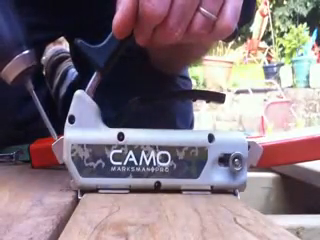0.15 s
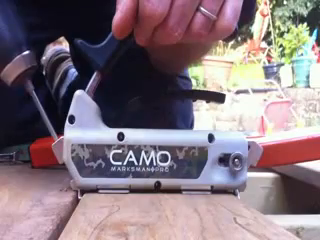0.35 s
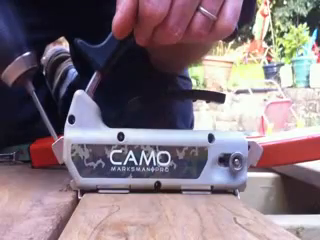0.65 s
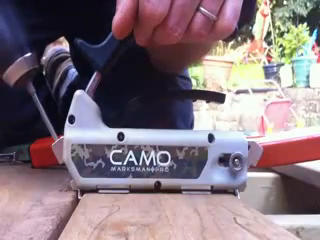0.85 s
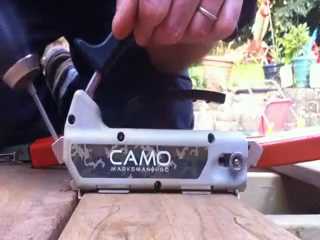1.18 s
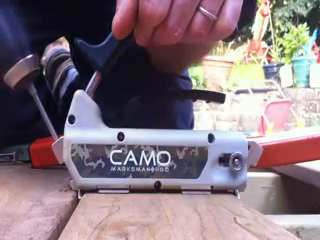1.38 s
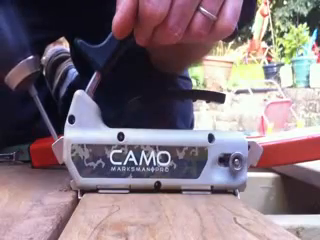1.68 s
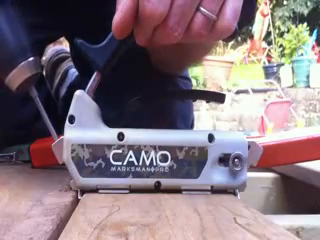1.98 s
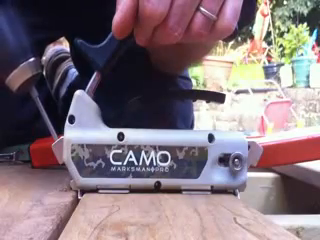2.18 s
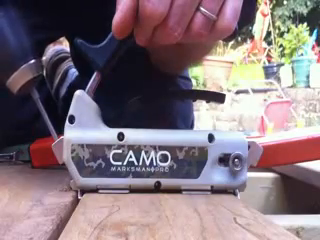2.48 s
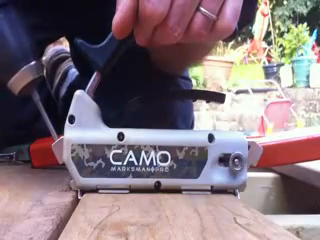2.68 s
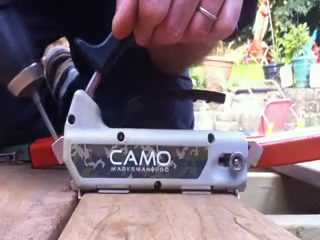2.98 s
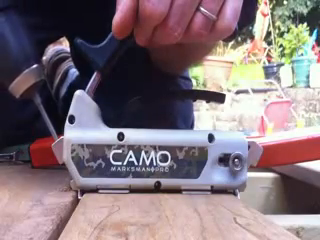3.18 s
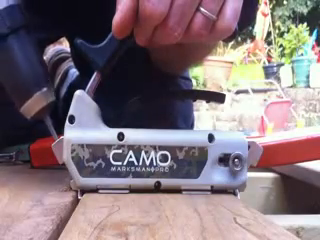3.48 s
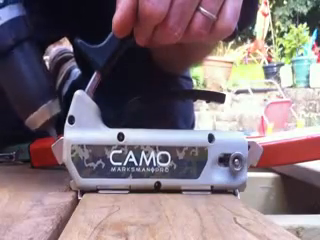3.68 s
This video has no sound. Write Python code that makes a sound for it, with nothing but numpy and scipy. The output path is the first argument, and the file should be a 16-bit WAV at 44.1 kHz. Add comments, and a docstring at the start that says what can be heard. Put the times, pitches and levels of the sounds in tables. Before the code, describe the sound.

A cordless drill, already at full speed and close to the microphone, whines shrilly over fan hiss; the screw grinds and squeaks in the hardwood board, then the pitch drops as it seats. Dry outdoor sound.

```python
"""A cordless drill runs flat out, close to the microphone, driving a screw into a hardwood board.
Its motor and gears whine as tones locked to the shaft angle; the speed sags as the screw bites.
Under them are shaped noise for fan air and brushes, and grainy noise for the thread in the wood.
The screw squeaks in short, rough tones, and the whine drops as the head seats."""
import sys
import numpy as np
from scipy import signal
from scipy.fft import rfft, irfft, next_fast_len
from scipy.io import wavfile
from scipy.ndimage import uniform_filter1d, map_coordinates

SR = 44100
rng = np.random.default_rng(int(sys.argv[2]) if len(sys.argv) > 2 else 0)


def dump_mix(stems):
    """Bounce the given channels to the path in sys.argv[1] as a 16-bit WAV at rate SR."""
    frames = np.atleast_2d(stems).T  # one column per channel
    limited = np.clip(frames, -1, 1)  # hard clip at full scale
    pcm = np.round(limited * 32767).astype(np.int16)
    wavfile.write(sys.argv[1], SR, pcm)


N = 169785  # length of the scene, samples

# Motor speed before its small jitter: time_s, speed_turns_per_s
MOTOR_SPEED = [(0, 119.2), (.2, 119.3), (.36, 119.55), (.6, 118.8), (.7, 118.9), (1.02, 118.27),
               (1.3, 117.92), (1.55, 118.0), (1.97, 117.48), (2.45, 117.4), (2.7, 116.42), (2.85, 116.34),
               (2.95, 116.86), (3.35, 116.3), (3.48, 115.9), (3.53, 115.1), (3.58, 115.55), (3.7, 113.7),
               (3.78, 110.5), (3.85, 105.6)]


def amp(db):
    """Decibels to gain."""
    return 10 ** (np.asarray(db) / 20)


def unit(x):
    """Scale to rms 1."""
    return x / np.sqrt(np.mean(x ** 2) + 1e-20)


def curves(rows):
    """One value per sample for each column after the time."""
    times_s, *columns = np.transpose(rows)
    return [np.interp(np.arange(N) / SR, times_s, column) for column in columns]


def wobble(rate):
    """A smooth random curve through rate random knots a second."""
    knots = rng.standard_normal(int(N * rate / SR) + 4)
    return map_coordinates(knots, [np.arange(N) * rate / SR])


def filtered(x, response):
    """x with its spectrum multiplied by a response of frequency in Hz."""
    size = next_fast_len(N + 8192)
    spectrum = rfft(x, size) * response(np.fft.rfftfreq(size, 1 / SR))
    return irfft(spectrum, size)[..., :N]


def coloured(x, spectrum):
    """x shaped by (Hz, dB) points joined along log frequency, at rms 1."""
    points_hz, points_db = np.transpose(spectrum)

    def response(hz):
        return amp(np.interp(np.log(hz + 1), np.log(points_hz), points_db))

    return unit(filtered(x, response))


def patchy(x, depth_db):
    """x with gains that drift at random over pitch and time, depth_db rms."""
    cells = signal.stft(x, nperseg=512)[2]
    field = rng.standard_normal(cells.shape)
    field = uniform_filter1d(field, size=3, axis=0)  # smooth over pitch
    field = uniform_filter1d(field, size=10, axis=1)  # smooth over time
    return signal.istft(cells * amp(depth_db * unit(field)), nperseg=512)[1][:N]


def rotor():
    """Angle of the motor shaft in radians: its speed, slightly unsteady, summed over time."""
    jitter_share, jitter_rate = 0.00071, 45  # share of the speed, knots per second
    speed, = curves(MOTOR_SPEED)
    unsteady = speed * (1 + jitter_share * wobble(jitter_rate))
    return 2 * np.pi * np.cumsum(unsteady) / SR


def hiss(angle):
    """Fan air and brush noise, pulsing three and six times in each turn of the rotor."""
    # Spectrum of the hiss, only its shape counts: frequency_hz, density_db_per_hz
    air_spectrum = [(30, -62.5), (60, -40), (100, -26.5), (160, -14), (250, -15), (420, -19.5),
                    (650, -13.5), (760, -10.5), (930, -15), (1100, -11.5), (1800, -10), (2080, -8),
                    (2300, -10), (2800, -9.5), (3350, -8.5), (3600, -1.5), (4150, 1), (4350, -4),
                    (4530, -2.5), (4750, -4), (5500, -4.5), (6700, -8.5), (7000, -11), (8450, -12.5),
                    (8800, -15), (9600, -19), (10350, -18), (10600, -32)]
    # Level of the hiss: time_s, level_db
    air_level = [(0, -20.5), (1.5, -20), (2.9, -19.5), (3.65, -19.5), (3.85, -19.5)]
    level_db, = curves(air_level)
    pulsing = amp(0.8 * (np.sin(3 * angle) + np.sin(6 * angle)))
    rattle = amp(0.73 * wobble(500) + 0.29 * wobble(25.07))
    air = patchy(rng.standard_normal(N), depth_db=1.42)
    return amp(level_db) * coloured(air * pulsing * rattle, air_spectrum)


def grind():
    """The thread tears through fibres: noise in uneven grains, rising and falling in level."""
    # Spectrum of the grinding, only its shape counts: frequency_hz, density_db_per_hz
    grind_spectrum = [(40, -56), (100, -27), (190, -2), (420, -4), (600, -2.5), (760, 5), (950, -3.5),
                      (1400, -1), (2500, -10.5), (5000, -22)]
    # Level of the grinding in the board: time_s, level_db
    grind_level = [(0, -43), (1.8, -38.5), (2.4, -37.5), (2.8, -34), (3.15, -38.5), (3.42, -41.5),
                   (3.6, -28), (3.72, -33), (3.85, -29.5)]
    level_db, = curves(grind_level)
    grains = rng.standard_normal(N) * amp(3.4 * wobble(250) + 1.8 * wobble(35))
    return amp(level_db) * coloured(grains, grind_spectrum)


def squeaks():
    """The screw sticks and slips: short tones with a randomly scattered pitch and one overtone."""
    # Squeaks of the screw: centre_s, length_s, pitch_hz, level_db, pitch_scatter (share of pitch)
    squeak_rows = [(2.547, .02, 736, -29, .06), (2.636, 0.02, 730, -27, 0.05), (2.732, .03, 740, -33, 0.02),
                   (2.769, .02, 739, -29.5, 0.03), (2.814, 0.015, 730, -27.5, .06),
                   (2.861, .014, 759, -28.5, 0.07), (2.903, .024, 756, -30.5, .07),
                   (2.992, .022, 760, -29, 0.02), (3.68, .024, 800, -29, 0.08),
                   (3.786, 0.018, 790, -24.5, 0.04), (3.841, 0.027, 782, -19.5, 0)]
    overtone_db = -18  # relative to the fundamental
    t = np.arange(N) / SR
    out = np.zeros(N)
    for centre_s, length_s, pitch_hz, level_db, scatter in squeak_rows:
        rough_pitch = pitch_hz * (1 + scatter * wobble(300))
        slip = 2 * np.pi * np.cumsum(rough_pitch) / SR
        swell = np.exp(-(2 * (t - centre_s) / length_s) ** 2)
        voice = unit(np.sin(slip) + amp(overtone_db) * np.sin(2 * slip))
        out += amp(level_db) * swell * voice
    return out


def tone(angle, order, rough, flutter_rate):
    """A tone of order cycles per shaft turn that flutters in level and phase, at rms 1."""
    flutter = 1 + rough * (wobble(flutter_rate) + 1j * wobble(flutter_rate))
    phase = order * angle + rng.uniform(0, 2 * np.pi)
    return unit(np.real(flutter * np.exp(1j * phase)))


def sway(angle, ratio, depth_db):
    """Gain that swings once per turn of a slower stage, at ratio turns per motor turn."""
    return unit(amp(depth_db * np.sin(ratio * angle + rng.uniform(0, 2 * np.pi))))


def housing(hz):
    """Gain of the gear housing: a tone gets louder as its pitch slides through the resonance."""
    centre_hz, half_width_hz, peak_db = 5175, 28, 13
    return amp(peak_db / (1 + ((hz - centre_hz) / half_width_hz) ** 2))


def whine(angle):
    """Three strong gear tones, swayed by chuck and planet carrier, over the weaker motor orders."""
    # Level of the two main whine tones: time_s, lower_tone_db, upper_tone_db
    main_level = [(0, -21, -24), (.42, -22.5, -25), (.5, -20, -21), (.95, -22, -20), (1.15, -23, -19.5),
                  (1.4, -21, -19), (1.8, -21, -19.5), (1.95, -19, -18), (2.45, -18, -18), (2.7, -21, -16),
                  (3.0, -18.5, -16), (3.25, -20, -16), (3.7, -20, -17), (3.76, -21, -25),
                  (3.85, -24.5, -26)]
    # Level of the third tone, before the dip on seating: time_s, level_db
    third_level = [(0, -27), (1.2, -26), (2.6, -32), (3.2, -29), (3.85, -34)]
    # Weaker motor and gear tones, before housing and seating dip: cycles_per_motor_turn, level_db
    weak_orders = {3: -40.5, 6: -48, 9: -42.9, 12: -49, 15: -47, 18: -44.5, 21: -38, 24: -42.5, 27: -40.5,
                   35: -40.5, 36: -36.5, 38: -36, 42: -36.5, 45: -48.5, 46: -34, 48: -45.5, 57: -48, 63:
                   -47, 66: -47.8, 72: -49, 78: -44.5, 81: -60.5}
    carrier_ratio, chuck_ratio = 0.195, 1 / 13  # turns per motor turn
    seat_s, seat_fade_s, seat_dip_db = 3.72, 0.07, 12

    lower_db, upper_db = curves(main_level)
    third_db, = curves(third_level)
    speed, = curves(MOTOR_SPEED)

    lower = amp(lower_db) * tone(angle, order=30, rough=0.08, flutter_rate=20)
    lower *= sway(angle, chuck_ratio, depth_db=0.96)
    upper = amp(upper_db) * tone(angle, order=32, rough=0.073, flutter_rate=40)
    upper *= sway(angle, carrier_ratio, depth_db=1.37)
    third = amp(third_db) * tone(angle, order=34, rough=0.16, flutter_rate=40)
    third *= sway(angle, chuck_ratio, depth_db=1.9)

    weak = np.zeros(N)
    for order, level_db in weak_orders.items():
        voice = tone(angle, order, rough=0.11, flutter_rate=25)
        weak += amp(level_db) * housing(order * speed) * voice

    # the third and weaker tones sink as the head seats
    seating = np.clip((np.arange(N) / SR - seat_s) / seat_fade_s, 0, 1)
    return lower + upper + amp(-seat_dip_db * seating) * (third + weak)


def scene():
    """Drill and screw in the open air, the same in both channels."""
    angle = rotor()
    sound = hiss(angle) + grind() + squeaks() + whine(angle)
    return np.array([sound, sound])


def record(dry):
    """The recorder keeps nothing above its band limit."""
    top_hz = 10650
    return filtered(dry, lambda hz: hz < top_hz)


dry = scene()
out = record(dry)
dump_mix(out)
```